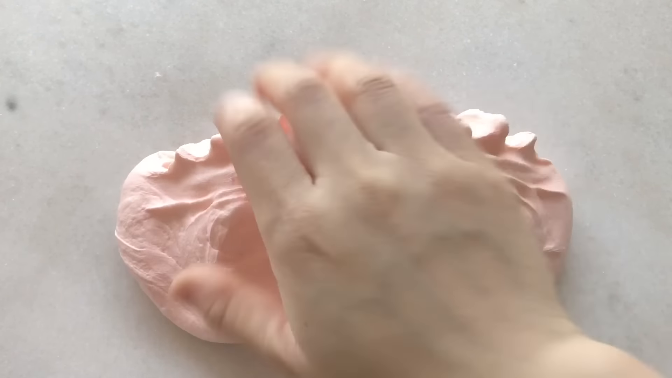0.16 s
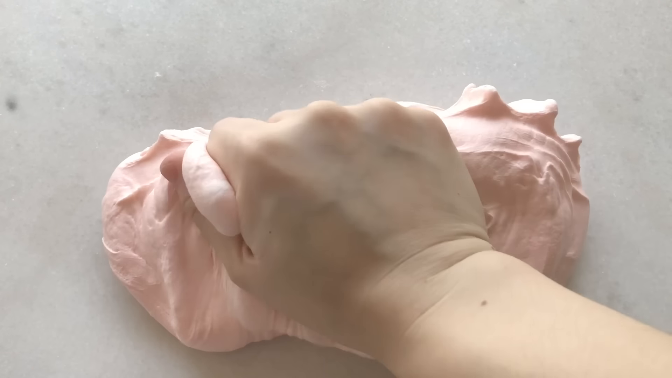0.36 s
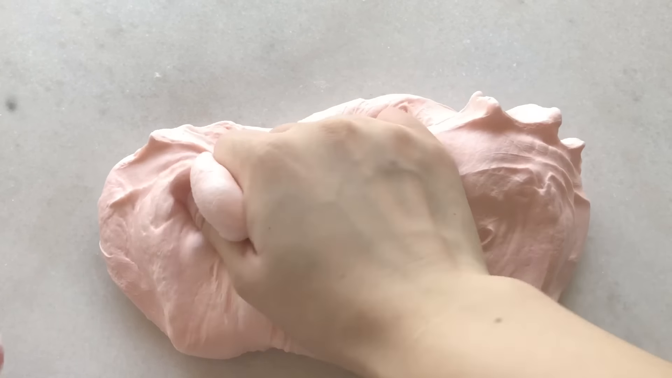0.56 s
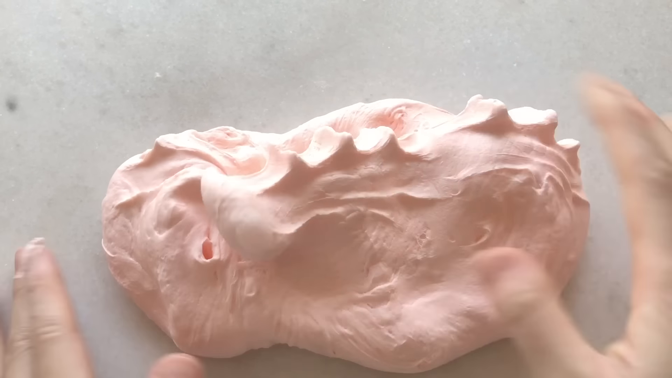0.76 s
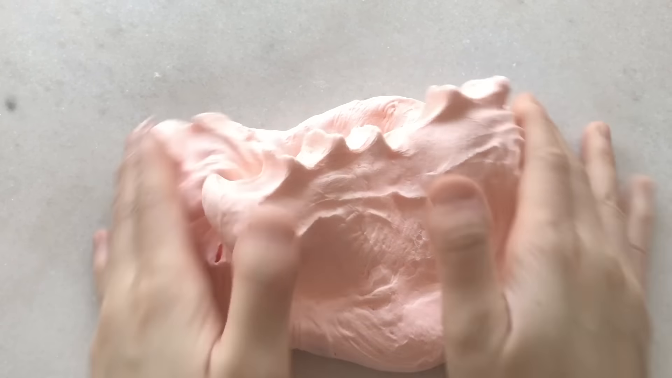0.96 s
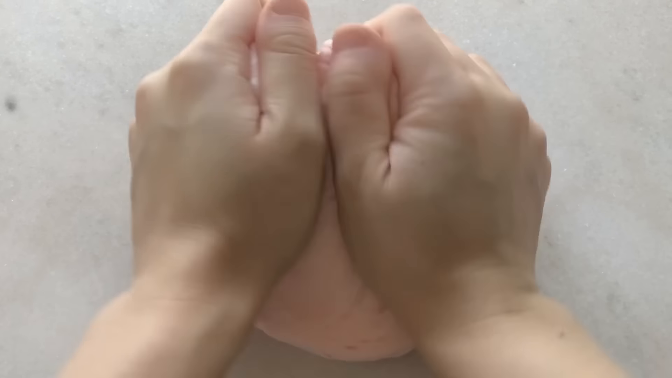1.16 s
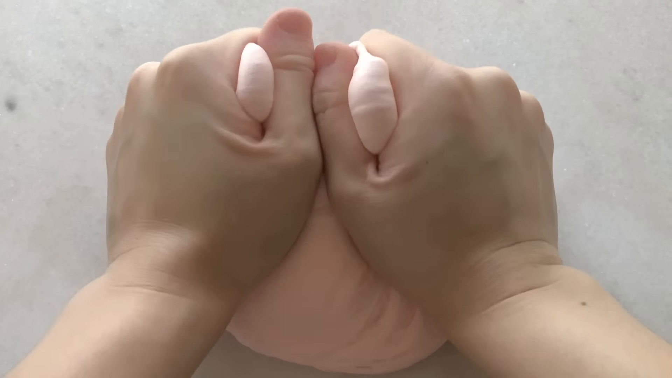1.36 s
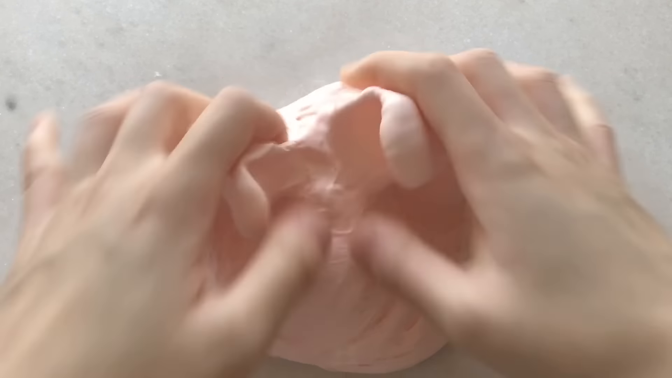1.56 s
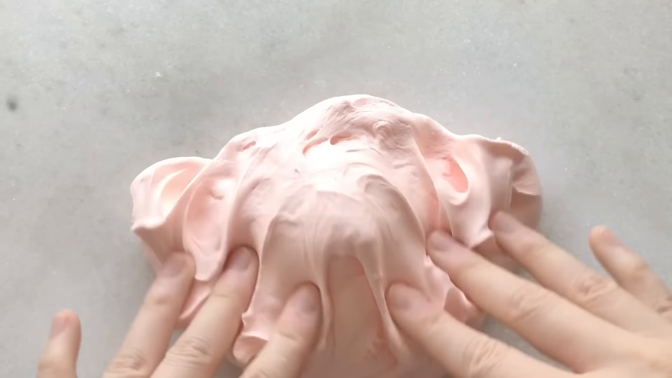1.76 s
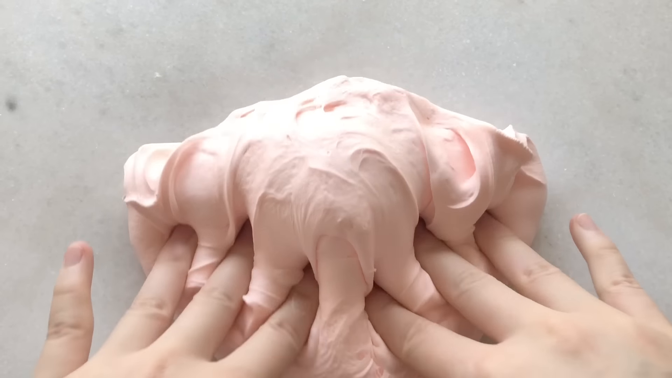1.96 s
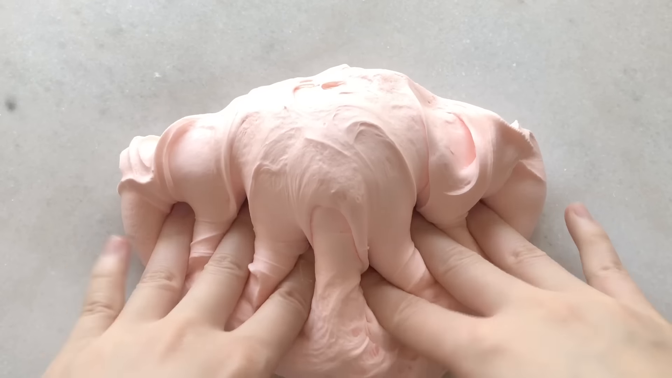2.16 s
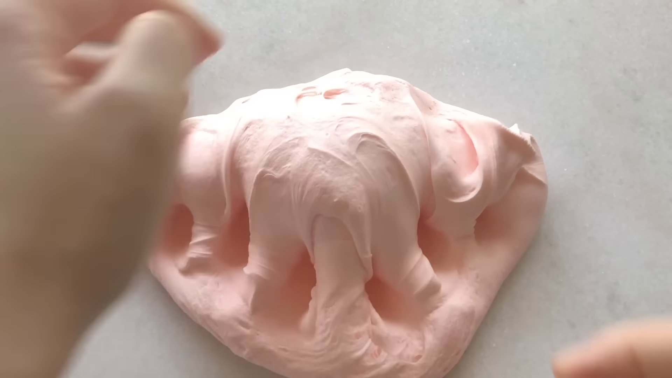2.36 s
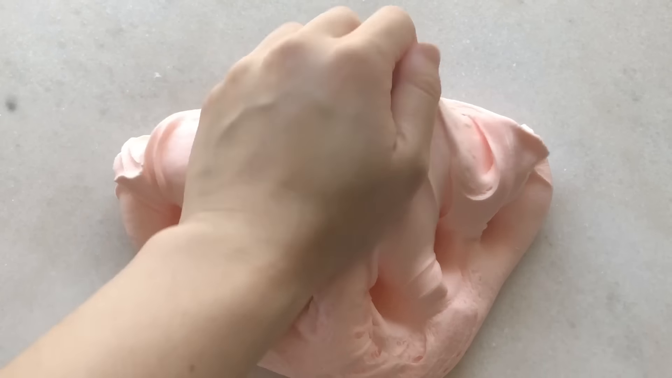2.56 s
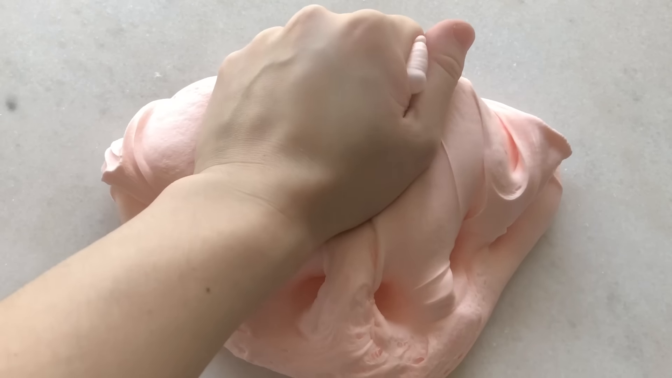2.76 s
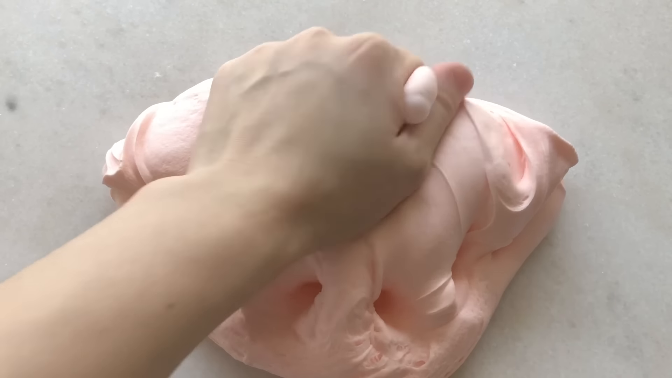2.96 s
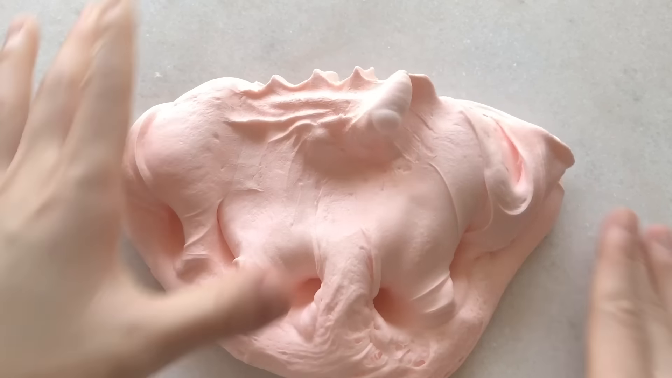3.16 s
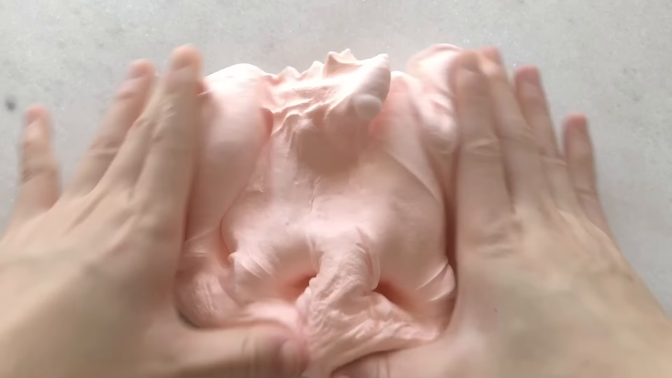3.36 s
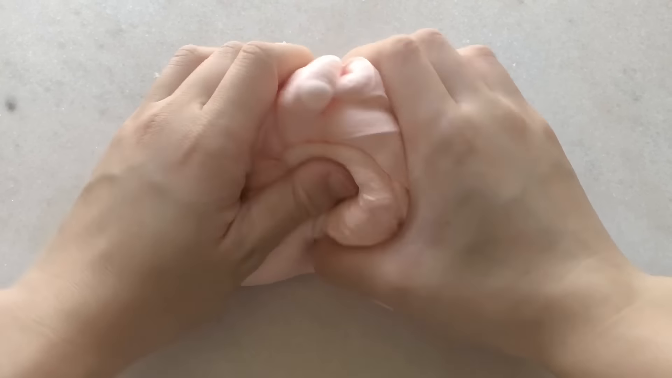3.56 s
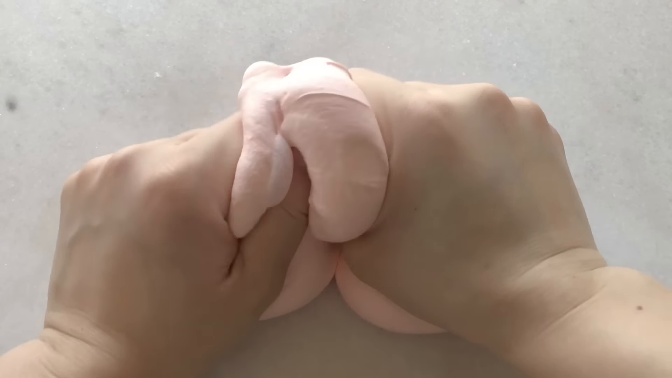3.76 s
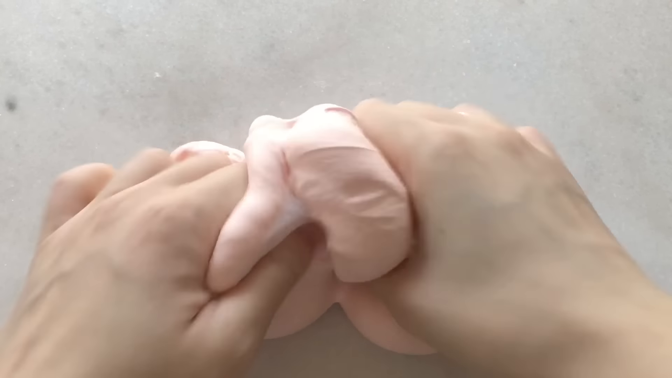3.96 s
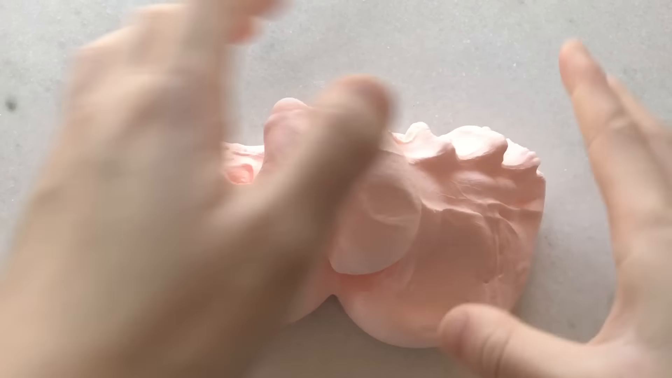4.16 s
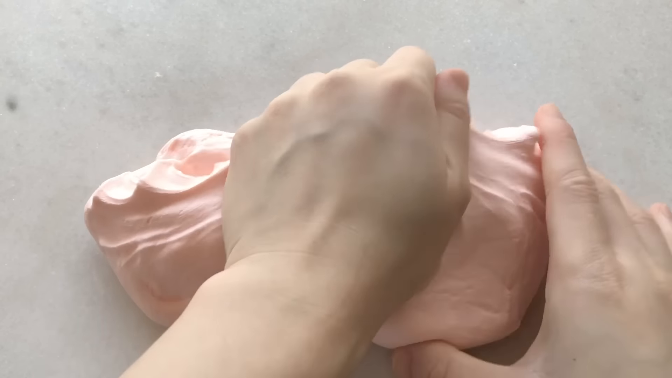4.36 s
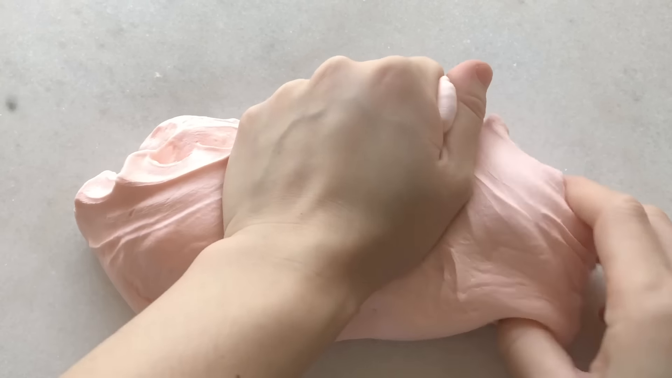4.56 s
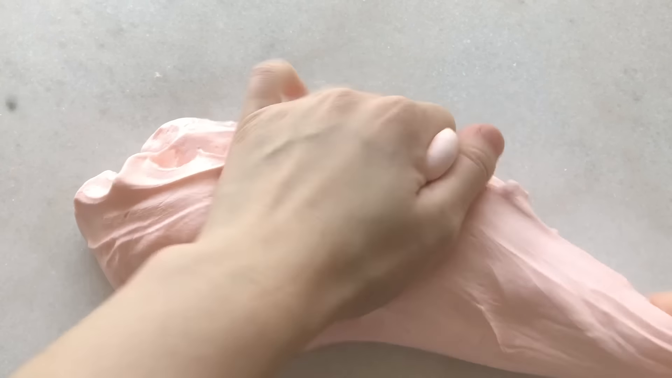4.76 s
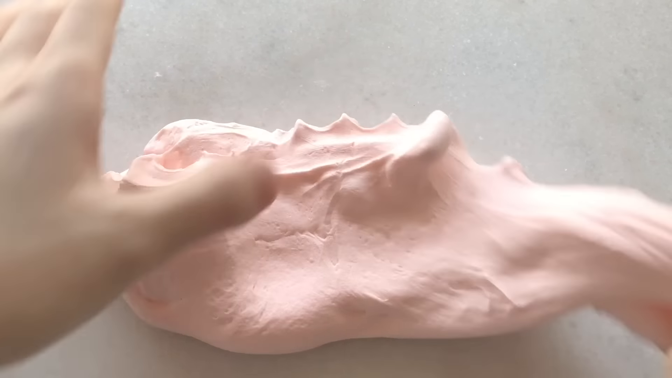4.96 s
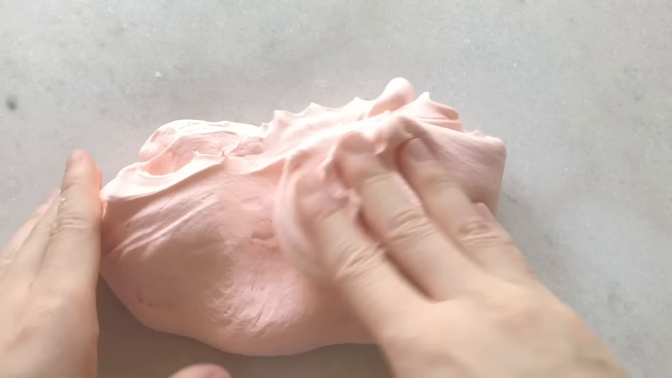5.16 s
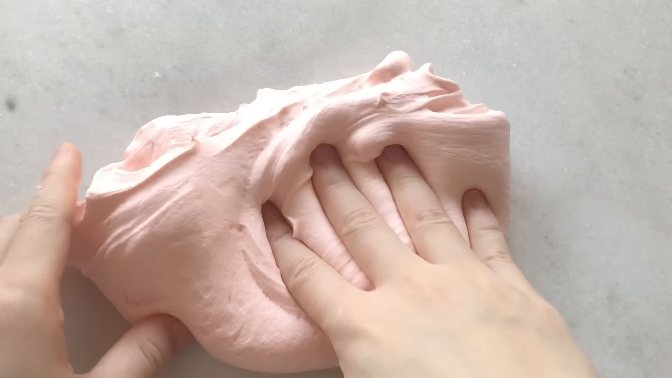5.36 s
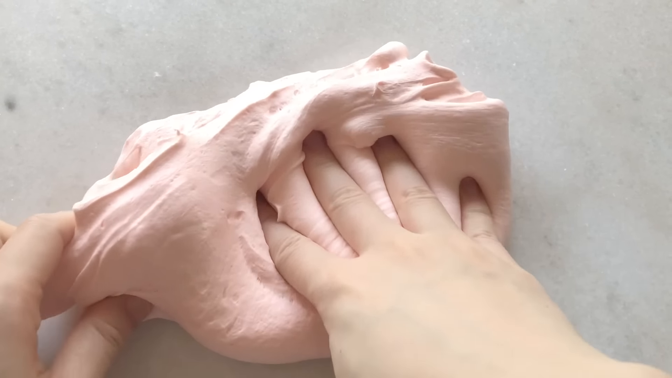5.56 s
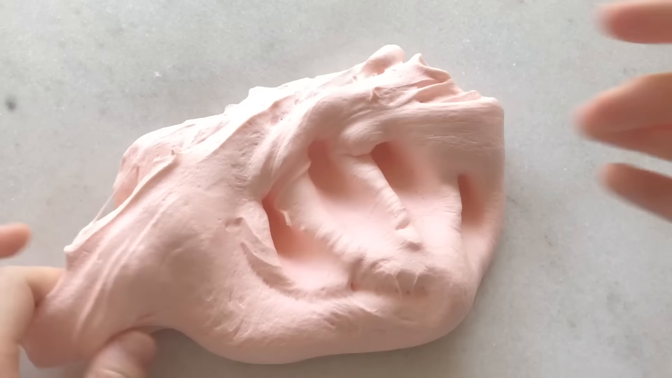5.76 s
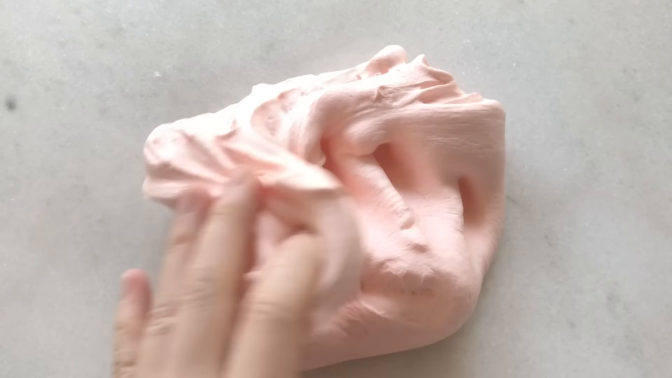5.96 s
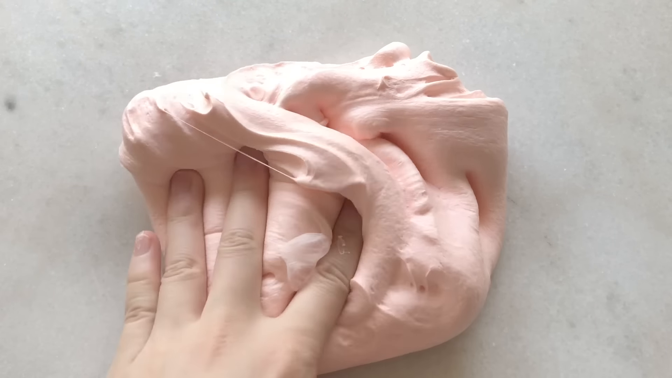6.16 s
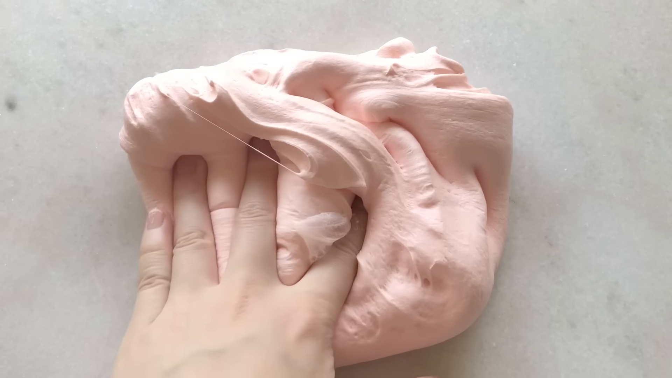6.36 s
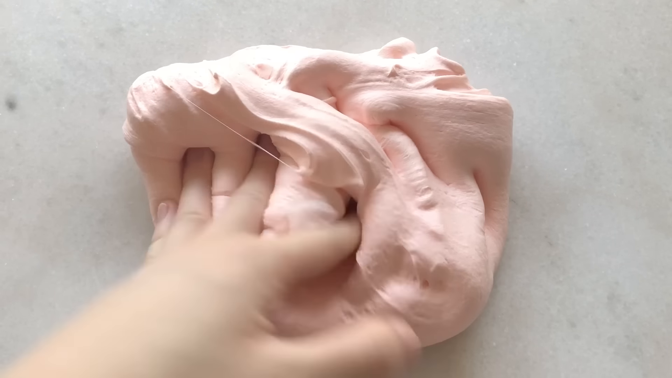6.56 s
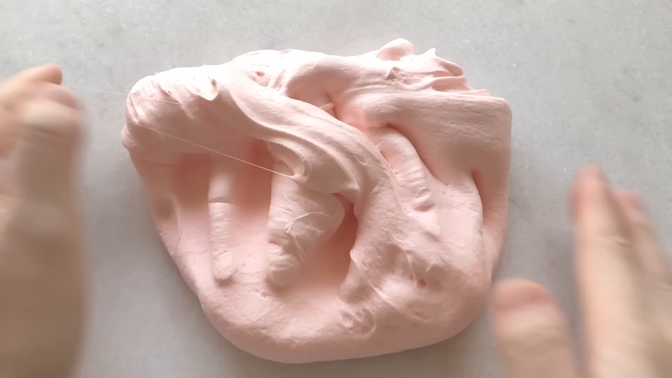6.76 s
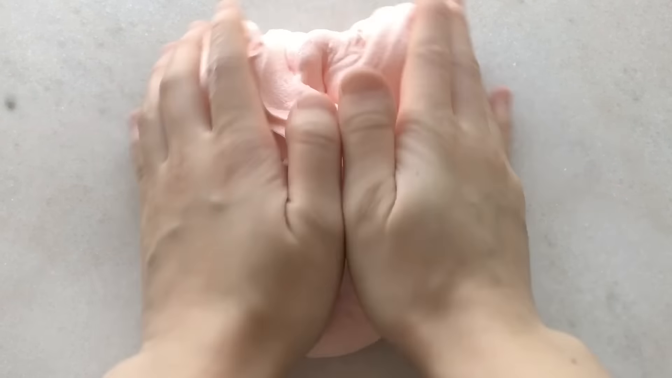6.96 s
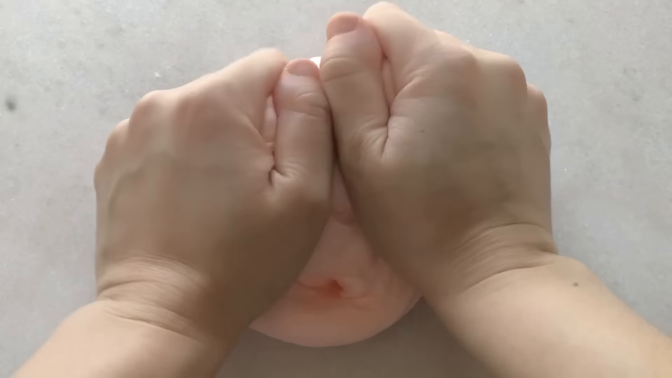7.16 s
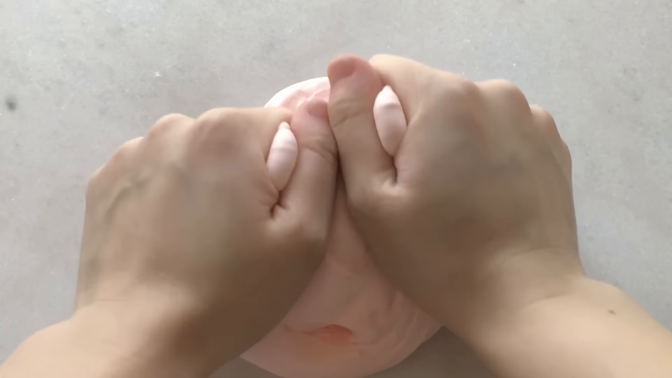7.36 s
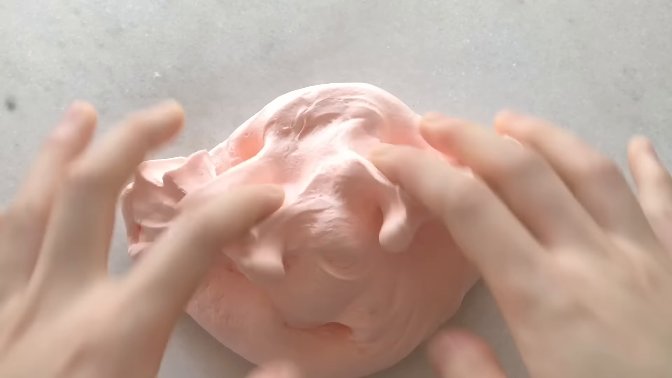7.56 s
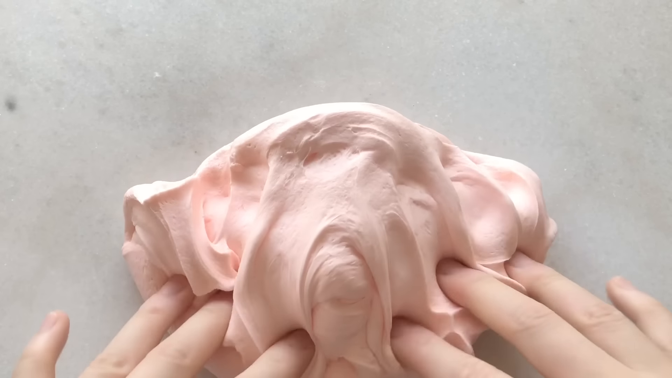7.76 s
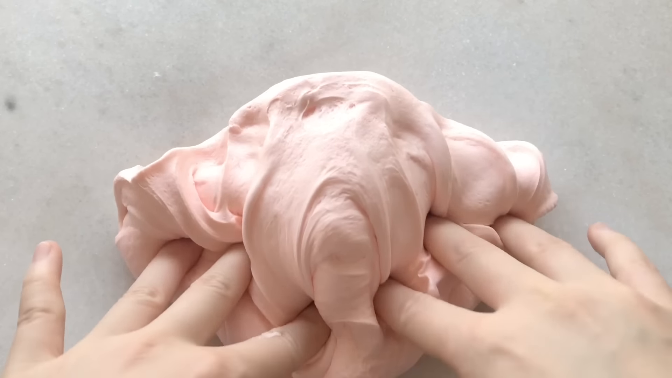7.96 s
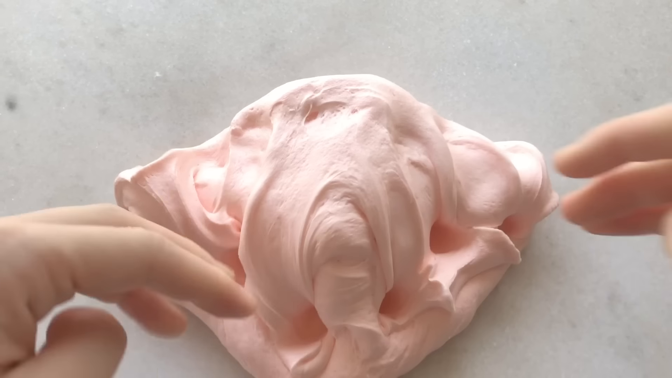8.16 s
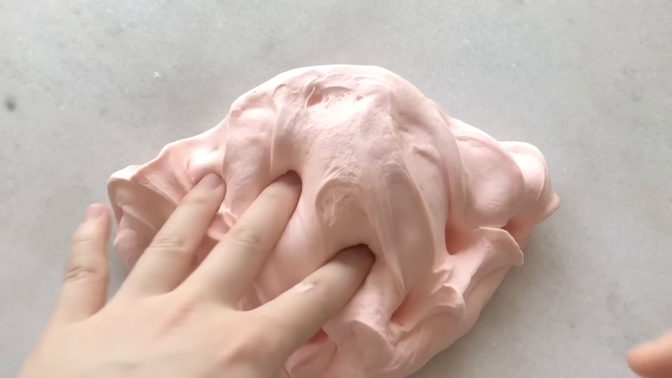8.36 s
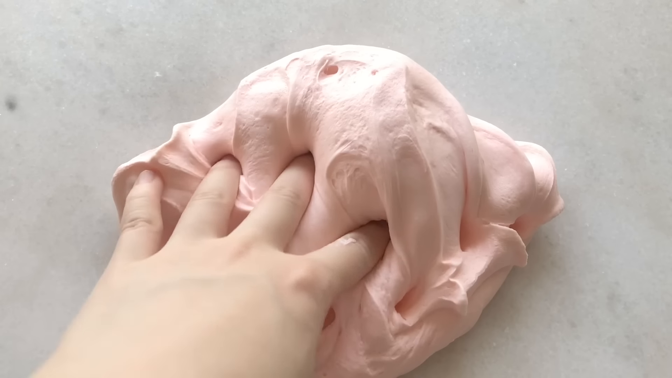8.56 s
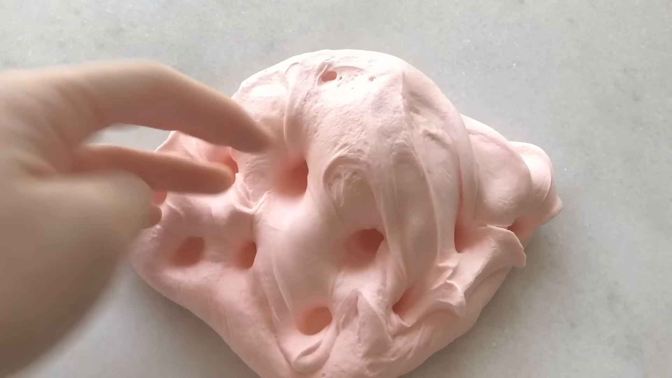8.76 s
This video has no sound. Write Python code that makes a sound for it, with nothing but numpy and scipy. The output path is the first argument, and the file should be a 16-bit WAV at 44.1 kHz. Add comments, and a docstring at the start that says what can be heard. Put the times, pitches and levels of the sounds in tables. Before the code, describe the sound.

A thick foamy slime is squeezed and poked by hand on a hard table, very close, in a small quiet room with faint hiss and a soft low hum. From 0.25 to 0.5 s bright crackles burst in a tight run, then a sticky squelch at 0.65. The strongest early pops, sharp with hollow plops, come at 1.25 to 1.4, with a wet squish near 1.6. Quiet follows until a squelchy plop at 2.3, then snaps around 2.8 and 3.05. From 3.4 to 4.1 softer tacky crackling continues; isolated pops land at 4.55 and 4.85. Faint ticks lead to a burst at 5.7, near silence from 6, and a sticky plopping cluster at 6.65. Loud snaps return at 7.2 to 7.35, a squish at 7.5, a dense popping burst at 8.15, and final sharp cracks at 8.7, then it settles.

```python
"""Thick foamy slime squeezed, folded and poked by hands on a hard table in a small quiet room.
Trapped air pockets burst: the film cracks as a short damped ring with a spray of noise, and a plop of
falling pitch follows the larger ones. The sticky mass tears off skin and table in dense ringing grains.
A near surface returns cracks and tearing 2.6 ms later; table top and room ring on.
Below lie steady coloured noise with a low hum, and a few brief rough tones."""
import sys
import numpy as np
from scipy import signal
from scipy.fft import rfft, irfft
from scipy.io import wavfile

SR = 44100
rng = np.random.default_rng(int(sys.argv[2]) if len(sys.argv) > 2 else 0)


def waveform_to_disk(signal):
    """Save audio, clipped to [-1, 1], as 16-bit WAV at the path in sys.argv[1]."""
    frames = np.transpose(np.atleast_2d(signal))
    scaled = np.clip(frames, -1, 1) * 32767
    samples = np.round(scaled).astype(np.int16)
    wavfile.write(sys.argv[1], SR, samples)


def to_linear_factor(level_db):
    """Convert decibel levels (scalar or array-like) to linear amplitude factors."""
    exponent = np.asarray(level_db, float) / 20
    return 10 ** exponent


N = 388080
NEAR_S = 0.0026  # delay of the near surface


def rms_one(x):
    """Scale to rms 1."""
    return x / np.sqrt(np.mean(x ** 2) + 1e-20)


def band(x, low_hz, high_hz, order=2):
    """Butterworth band-pass."""
    edges_hz = [low_hz, min(high_hz, 0.45 * SR)]
    return signal.sosfilt(signal.butter(order, edges_hz, "band", fs=SR, output="sos"), x)


def ring(clicks, hz, t60_s):
    """Two-pole resonator: a unit click starts a decaying sine of height 1."""
    r = to_linear_factor(-60 / (t60_s * SR))
    w = 2 * np.pi * hz / SR
    return signal.lfilter([0, np.sin(w)], [1, -2 * r * np.cos(w), r * r], clicks + 1e-18)


def drift(knots_per_s):
    """Slow random wander: normal knots joined by straight lines, at most 40 knots per s."""
    knots = rng.standard_normal(int(N / SR * 40) + 3)
    return np.interp(np.arange(N) / SR * knots_per_s, np.arange(len(knots)), knots)


def place(times_s, shapes):
    """Add one short sound per row at its time."""
    out = np.zeros(N + SR)
    at = np.round(times_s * SR).astype(int)[:, None] + np.arange(shapes.shape[1])
    np.add.at(out, at, shapes)
    return out[:N]


# spectrum of the room tone, relative: pitch_hz, density_db (per Hz)
ROOM_SPECTRUM = [(15, -44), (25, 4), (53, 8.5), (76, 12), (212, 6.5), (575, -11), (1040, -13),
                 (2550, -22.5), (4610, -28), (5570, -25), (7710, -30.5), (14800, -29), (16000, -13.5)]


def room_tone(noise_db=-51, waver_db=1.5, waver_per_s=4, hum_hz=80, hum_db=-59, hum_half_width_hz=8):
    """Coloured noise, slightly wavering, plus a narrow noise band as a soft low hum."""
    hz = np.fft.rfftfreq(N, 1 / SR) + 1
    points = np.array(ROOM_SPECTRUM)
    colour = to_linear_factor(np.interp(np.log(hz), np.log(points[:, 0]), points[:, 1]))
    noise = rms_one(irfft(rfft(rng.standard_normal(N)) * colour, N))
    hum = rms_one(band(rng.standard_normal(N), hum_hz - hum_half_width_hz, hum_hz + hum_half_width_hz))
    return to_linear_factor(noise_db + waver_db * drift(waver_per_s)) * noise + to_linear_factor(hum_db) * hum


# brief rough tones: start_s, length_s, pitch_hz, level_db (rms at the top of the swell)
ROUGH_TONES = [(2.455, .07, 284, -49), (2.5, .06, 1000, -64), (2.44, .11, 1370, -58),
               (2.46, .08, 1920, -60), (2.46, .09, 2850, -62), (1.72, .22, 197, -51), (8.33, .2, 1570, -69),
               (4.88, .045, 1000, -39), (7.615, .018, 900, -42), (3.835, .03, 2050, -41),
               (5.92, .025, 900, -56)]


def rough_tones():
    """Narrow noise bands that swell and fade as half a sine; shorter ones are wider."""
    out = np.zeros(N)
    for start_s, length_s, hz, level_db in ROUGH_TONES:
        swell = np.sin(np.pi * np.clip((np.arange(N) / SR - start_s) / length_s, 0, 1))
        widen_hz = 0.5 / length_s
        tone = band(rng.standard_normal(N), hz * 0.95 - widen_hz, hz * 1.05 + widen_hz)
        out += to_linear_factor(level_db) * swell * rms_one(tone)
    return out


def close_microphone(x, bass_cut_hz=218, presence_hz=6500, width_hz=2300, presence_db=2.1):
    """Bass cut, then a presence peak."""
    x = signal.sosfilt(signal.butter(4, bass_cut_hz, "high", fs=SR, output="sos"), x)
    presence = band(x, presence_hz - width_hz / 2, presence_hz + width_hz / 2, order=1)
    return x + (to_linear_factor(presence_db) - 1) * presence


# farther echoes: delay_s, level_db (re direct)
FARTHER_ECHOES = [(.0073, -19), (.0102, -19)]
# room tail by band: pitch_hz, t60_s, level_db (relative energy)
TAIL_BANDS = [(300, 0.3, -23), (900, 0.078, -25), (2700, 0.23, -14.5), (5840, 0.12, -14.5),
              (11000, 0.073, -8)]


def room(x):
    """Discrete echoes, then a tail of noise dying band by band."""
    t = np.arange(SR // 2) / SR
    response = np.zeros(len(t))
    for delay_s, level_db in FARTHER_ECHOES:
        response[round(delay_s * SR)] += to_linear_factor(level_db)
    for hz, t60_s, level_db in TAIL_BANDS:
        onset = 1 - np.exp(-t / 0.001)
        dying = band(rng.standard_normal(len(t)), hz / 1.4, hz * 2.2) * to_linear_factor(-60 * t / t60_s) * onset
        energy = np.sum(dying ** 2) / min(hz * 2 / SR, 1)  # wider bands keep more
        response += to_linear_factor(level_db) * dying / np.sqrt(energy)
    return x + signal.fftconvolve(x, response)[:N]


# low modes of the table top: pitch_hz, level_db (gain into the mode), t60_s
TABLE_MODES = [(183, -29, 0.023), (285, -46, 0.016)]


def table(x):
    """The slime shakes the table top, whose low modes ring on."""
    return x + sum(to_linear_factor(level_db) * ring(x, hz, t60_s) for hz, level_db, t60_s in TABLE_MODES)


# hand strokes tearing the mass: start_s, length_s, level_db (base), wetness_db, hollow_hz
HAND_STROKES = [(0.0, 0.0079, -36.5, -2.5, 390), (0.265, 0.049, -39.5, 3.5, 407),
                (0.366, 0.096, -44.5, -5, 400), (0.494, 0.042, -58, -1.5, 250),
                (0.586, 0.042, -66, -7.5, 210), (0.643, 0.062, -33.5, 5, 250), (0.694, 0.059, -37, 2, 290),
                (0.897, .08, -69, 0.5, 239), (1.028, 0.48, -48, 1.5, 320), (1.273, 0.0052, -27, 5, 355),
                (1.309, 0.021, -41, -11.5, 330), (1.368, 0.047, -41, -5.5, 590),
                (1.45, 0.068, -69, -9, 300), (1.56, 0.086, -31, 4, 315), (1.694, 0.42, -62, -1, 210),
                (2.293, 0.041, -30.5, 6.5, 414), (2.48, 0.14, -55.5, 6.5, 240),
                (2.653, 0.29, -57.5, -3.5, 230), (2.758, 0.08, -49, -4.5, 510),
                (2.878, 0.044, -62, -3, 230), (2.991, 0.011, -51, -1, 240), (3.051, 0.053, -33.5, 5.5, 261),
                (3.089, 0.057, -39, 1, 280), (3.329, 0.071, -52, 1.5, 228), (3.41, .16, -47, 0, 324),
                (3.617, 0.19, -50.5, 1, 300), (3.711, 0.0078, -41.5, 6.5, 490), (3.766, 0.15, -53, 3, 260),
                (3.853, 0.013, -43, 1.5, 400), (3.93, 0.13, -50, 2.5, 350), (3.994, 0.079, -41.5, 0.5, 350),
                (4.038, 0.071, -32, 3, 380), (4.364, 0.044, -54, 12, 300), (4.416, 0.2, -55.5, 2.5, 260),
                (4.553, 0.04, -47, -2, 674), (4.645, 0.011, -51.5, -22.5, 240),
                (4.707, 0.21, -57.5, 1.5, 230), (4.788, 0.0039, -39, 7, 294), (4.835, 0.055, -32, 3, 486),
                (5.007, 0.051, -48, -0.5, 280), (5.09, 0.74, -61, 1.5, 220),
                (5.707, 0.053, -34.5, 1.5, 340), (5.754, 0.022, -39, 15.5, 394),
                (5.84, 0.3, -57.5, -1, 260), (5.939, .09, -54, 6, 282), (6.102, 0.13, -63.5, 1.5, 218),
                (6.234, 0.065, -68.5, -14, 220), (6.301, 0.18, -72, 0.5, 220),
                (6.623, 0.045, -39.5, 0, 300), (6.665, 0.046, -35, 7.5, 370),
                (6.973, 0.082, -44.5, 1.5, 400), (7.052, 0.097, -54.5, 0, 285), (7.139, 0.082, -43, 2, 310),
                (7.21, 0.045, -66, -5, 450), (7.283, 0.032, -31, 2.5, 424), (7.35, 0.069, -51, 0, 400),
                (7.477, 0.11, -36, 1, 275), (7.598, 0.093, -49, 4.5, 255), (7.72, 0.33, -62, 0, 210),
                (8.14, 0.073, -37.5, 9, 450), (8.27, 0.26, -63.5, 2.5, 226), (8.717, 0.11, -41, 1, 277)]
# film crackle, suction, squelch: offset_db (re base), wetness_share (dB per dB),
# sag_db (over a stroke), rest_db (slime at rest)
PART_RULES = [(-0.5, -1.055, 5.5, -81), (-1.43, -0.28, 5.5, -84.5), (-2.5, 1.07, 4, -71)]


def strokes(rise_s=0.025, rise_share=0.3, fall_s=0.035, fall_share=0.15, rest_hollow_hz=210):
    """Levels in dB of the three tearing parts; hollow pitch is the squelch-power-weighted mean of strokes."""
    start_s, length_s, level_db, wet_db, hollow_hz = np.transpose(HAND_STROKES)[:, :, None]
    s = np.arange(0, N + 64, 64) / SR
    now_s = np.arange(N) / SR
    before_s = np.maximum(start_s - s, 0)
    after_s = np.maximum(s - start_s - length_s, 0)
    # 30 dB per rise or fall time: a fixed time plus a share of the length
    rise = before_s / (rise_s + rise_share * length_s)
    fall = after_s / (fall_s + fall_share * length_s)
    edges_db = -30 * (rise + fall)
    done = np.clip((s - start_s) / length_s, 0, 1)
    levels_db = []
    for offset_db, share, sag_db, rest_db in PART_RULES:
        power = to_linear_factor(level_db + offset_db + share * wet_db - sag_db * done + edges_db) ** 2
        rest = to_linear_factor(rest_db) ** 2
        total = power.sum(0) + rest
        levels_db.append(np.interp(now_s, s, 10 * np.log10(total)))
    # the loop leaves the squelch in power, rest and total
    hollow = ((power * hollow_hz).sum(0) + rest * rest_hollow_hz) / total
    return levels_db, np.interp(now_s, s, hollow)


# grains of film crackle, suction, squelch: low_hz, high_hz, rate_per_s, size_spread_db,
# decay_cycles (to 1/e)
GRAIN_PARTS = [(4100, 19600, 13000, 3.5, 1.0), (806, 4110, 3000, 3.5, 1.7), (157.3, 1000, 700, 3.5, 1.8)]


def tack(levels_db, hollow_hz, pitches=10, tilt_db_per_octave=-0.3, hollow_octaves=0.48, hollow_db=9,
         clump_db=2.3, clumps_per_s=38.0, near_db=-16.5):
    """Threads of slime snap at random, in clumps, each ringing at one of ten pitches; the hollow favours its own."""
    out = np.zeros(N)
    clumps_db = clump_db * drift(clumps_per_s)
    for level_db, (low_hz, high_hz, per_s, spread_db, cycles) in zip(levels_db, GRAIN_PARTS):
        born = rng.random(N) < per_s / SR
        size_db = spread_db * np.minimum(rng.exponential(1, N), 5)
        snaps = born * to_linear_factor(size_db) * rng.choice([-1, 1], N)
        dealt = rng.integers(0, pitches, N)
        grains, power = 0, 0
        for k, hz in enumerate(np.geomspace(low_hz * 1.1, high_hz, pitches)):
            favour = np.exp(-0.5 * (np.log2(hz / hollow_hz) / hollow_octaves) ** 2)
            gain = to_linear_factor(hollow_db * favour + tilt_db_per_octave * np.log2(hz / low_hz))
            t60_s = np.log(1000) * cycles / hz
            grains = grains + gain * rms_one(ring(snaps * (dealt == k), hz, t60_s))
            power = power + gain ** 2
        grains = band(grains / np.sqrt(power), low_hz / 1.026, high_hz * 1.2)
        out += grains * to_linear_factor(level_db + clumps_db)
    lag = round(NEAR_S * SR)
    out[lag:] += to_linear_factor(near_db) * out[:-lag]
    return out


# large pockets emptying: start_s, level_db (envelope peak at source), pitch_hz (settled)
POCKET_PLOPS = [(0.249, -27.5, 332), (0.259, -26.5, 650), (0.287, -39, 315), (0.413, -30.5, 290),
                (0.462, -37.5, 272), (0.632, -34, 250), (0.653, -26, 265), (0.688, -27, 894),
                (0.722, -32.5, 283), (0.887, -33.5, 280), (1.107, -36.5, 310), (1.176, -50, 221),
                (1.184, -32.5, 348), (1.204, -48, 232), (1.262, -15, 540), (1.267, -15, 345),
                (1.302, -40, 363), (1.362, -47, 840), (1.56, -21.5, 412), (1.566, -22.5, 402),
                (1.604, -26.5, 225), (2.28, -18.5, 330), (2.294, -26, 355), (2.302, -27, 496),
                (2.314, -17.5, 467), (2.348, -25.5, 613), (2.375, -38, 269), (2.775, -24, 425),
                (3.051, -17, 246), (3.082, -24, 288), (3.095, -28.5, 910), (3.105, -37, 299),
                (3.685, -23, 325), (3.993, -39, 221), (4.046, -20, 400), (4.09, -43, 304),
                (4.102, -42, 872), (4.332, -30, 514), (4.364, -26.5, 292), (4.785, -33, 286),
                (4.834, -20.5, 260), (4.852, -25, 285), (4.856, -16, 730), (5.195, -39.5, 252),
                (5.699, -20, 274), (5.718, -33, 226), (5.751, -34, 465), (5.782, -22, 321),
                (6.625, -23, 260), (6.67, -29, 300), (6.686, -22, 362), (6.699, -24.5, 426),
                (6.71, -20.5, 375), (6.928, -39.5, 257), (7.137, -36, 250), (7.151, -33.5, 272),
                (7.176, -24.5, 364), (7.202, -32, 354), (7.265, -7, 369), (7.293, -44, 463),
                (7.506, -30, 410), (7.529, -30.5, 213), (7.673, -45, 255), (8.128, -10, 445),
                (8.152, -7, 970), (8.154, -21.5, 244), (8.169, -23, 1000), (8.177, -20, 610),
                (8.182, -16, 385), (8.708, -21, 269), (8.733, -21.5, 282), (8.749, -24, 280)]


def plops(peak_cycles=1.25, fall=2.6, fall_cycles=0.38, rough=0.55):
    """An emptied pocket plops: pitch falls from (1 + fall) times to its settled value, phase wobbling."""
    start_s, level_db, hz = np.transpose(POCKET_PLOPS)[:, :, None]
    t = np.arange(1300) / SR
    turns = hz * t + fall * fall_cycles * (1 - np.exp(-hz * t / fall_cycles))
    wobble = np.cumsum(rng.standard_normal((len(POCKET_PLOPS), len(t))), axis=1)  # wet walls
    turns = turns + rough * wobble * np.sqrt(hz / SR) / 10
    age = t * hz / peak_cycles
    envelope = np.e * age * np.exp(-age)
    return place(start_s[:, 0], to_linear_factor(level_db) * envelope * np.sin(2 * np.pi * turns))


def small_cracks(film_db, count=700, per_s=40.0, above_film_db=16, spread_db=5.5, max_db=-22,
                 low_hz=1900, high_hz=9650, echo_db=-11):
    """Crack rows for small pockets at random times, their level following the film crackle."""
    gap, size, pitch = rng.random((count, 3)).T
    start_s = np.cumsum(-np.log(1 - gap)) / per_s
    film_now_db = film_db[np.minimum(start_s * SR, N - 1).astype(int)]
    level_db = film_now_db + above_film_db + spread_db * (2 * size - 1)
    hz = low_hz * (high_hz / low_hz) ** pitch
    return np.c_[np.minimum(start_s, N / SR), np.minimum(level_db, max_db), hz, 0 * start_s + echo_db]


# films of air pockets rupturing: start_s, level_db (at source), pitch_hz,
# echo_db (near echo re crack, capped in cracks)
POCKET_CRACKS = [(0.2424, -23, 3740, -3.5), (0.2653, -30, 6730, -6), (0.2784, -35, 3470, 2),
                 (0.2878, -15.5, 2940, -10), (0.3064, -29, 7700, 12), (0.3166, -21, 8060, -6),
                 (0.3247, -26, 2920, -2), (0.3469, -8, 7330, -3), (0.3536, -15.5, 7240, -3),
                 (0.3664, -6, 7100, -10.5), (0.3698, 0.5, 8730, -4), (0.4063, -23, 2990, 0),
                 (0.413, -8.5, 14000, -5), (0.42, -5.5, 12700, -5), (0.461, -32, 2380, -8),
                 (0.4683, -16.5, 10100, -6), (0.632, -26, 5480, 4), (0.6506, -19, 4150, -3),
                 (0.6876, -24, 3540, 3), (0.7224, -26, 3140, 0), (0.767, -31, 3510, -8),
                 (0.8842, -44, 3690, -21), (0.9254, -37, 2380, -10), (0.9961, -33, 4420, -3),
                 (1.104, -27, 3070, -9), (1.134, -32, 3590, -4), (1.175, -25.5, 2410, -10),
                 (1.1847, -26, 6590, -6), (1.216, -28, 6690, -6), (1.253, -27, 11500, -4),
                 (1.264, -5.5, 3400, -12), (1.269, -2, 3160, -10), (1.294, -12, 9490, -3),
                 (1.3042, 5, 6800, -7), (1.3314, -14, 12400, -2), (1.364, 3, 5770, -1),
                 (1.379, -11, 6120, -6), (1.4356, -25, 3420, -9), (1.5517, -24, 3220, -3),
                 (1.5571, -14, 4440, 1), (1.5646, -12, 4070, -6), (1.574, -22, 3530, -2),
                 (1.6044, -23, 2840, 0), (1.6558, -24, 5520, -2), (1.6821, -31.5, 2440, 0),
                 (1.777, -35, 2830, -3), (1.7993, -35, 11100, -6), (1.8724, -24, 4910, -14),
                 (1.8886, -31, 4930, -14), (1.894, -30.5, 4110, -7), (1.9428, -34.5, 3710, -10),
                 (2.1027, -47.5, 2470, -10), (2.2785, -15.5, 5580, -4), (2.2944, -24, 5180, -3),
                 (2.3018, -16, 7750, -3), (2.3129, -12, 6890, 9), (2.3475, -15, 4700, -15.5),
                 (2.575, -42, 3050, -5.5), (2.615, -22, 9000, -0.5), (2.655, -29.5, 3990, -3),
                 (2.7024, -29, 13100, -8), (2.7116, -22.5, 7100, 2), (2.7326, -24, 13400, -8),
                 (2.7578, -23, 7500, 3), (2.7738, -4, 4970, 12), (2.8314, -40, 14300, -8),
                 (2.8565, -22.5, 8550, -4), (2.8737, -13, 14100, -15), (2.9095, -18, 4100, -5),
                 (2.9832, -25, 13300, 2), (3.0518, -13.5, 3450, -4), (3.0834, -29, 3560, -5.5),
                 (3.096, -28, 2970, -6), (3.1164, -20, 4870, -7), (3.3144, -43, 3050, -8),
                 (3.3323, -45, 3100, -5.5), (3.3906, -35, 3630, -11), (3.4626, -39, 3060, -6),
                 (3.5349, -25.5, 3830, 5), (3.574, -27, 4990, -14), (3.5865, -20.5, 2920, -5),
                 (3.6003, -26, 5360, -17), (3.63, -39, 2860, -6), (3.6735, -20.5, 5710, -10),
                 (3.686, -8.5, 2870, -4.5), (3.706, -17, 7310, -4), (3.7236, -20, 5570, -13),
                 (3.7417, -26, 5100, -14), (3.765, -16, 3540, -5), (3.7834, -25, 7260, -19.5),
                 (3.7903, -17, 6750, -9), (3.7985, -19, 6300, -18), (3.8411, -15.5, 8300, 10),
                 (3.925, -11.5, 3720, -3.5), (3.9304, -26, 3820, -2), (3.9903, -31, 7030, -6),
                 (4.001, -28, 7060, -9), (4.0253, -32, 3580, -1), (4.0461, -17, 2450, -8),
                 (4.0914, -28.5, 5320, 1.5), (4.3092, -37, 2520, -7.5), (4.3311, -30, 2650, -1),
                 (4.362, -32.5, 2460, -4), (4.4026, -28, 3420, -10), (4.4209, -39, 3000, -6),
                 (4.4935, -22, 10300, 2.5), (4.5501, -7.5, 3900, 3), (4.566, -32, 3630, -6),
                 (4.616, -28, 2620, -4), (4.6239, -21, 13500, -6), (4.6334, -21, 3660, 4),
                 (4.6409, -26, 6520, -9), (4.7855, -26, 4060, -6), (4.825, -24, 4550, -12),
                 (4.8542, -21, 4730, 6), (4.8564, -18.5, 2930, -6), (5.004, -31, 2730, 2),
                 (5.1952, -34, 7240, -19), (5.2044, -31, 3540, 0), (5.2264, -24, 6200, -10),
                 (5.245, -30, 6890, 2), (5.2666, -28, 6160, -18), (5.2757, -27, 2400, 4),
                 (5.2937, -17.5, 9100, -9), (5.6214, -37, 5900, -10), (5.6985, -12.5, 5500, 7),
                 (5.716, -21, 8100, -4), (5.7501, -12.5, 2450, -10), (5.7608, -16.5, 2840, -9),
                 (6.1666, -33, 6270, -11.5), (6.195, -37.5, 7600, -5), (6.4662, -43.5, 3110, -7),
                 (6.6254, -13.5, 4520, -1.5), (6.6608, -22, 2690, 3), (6.6709, -19, 3550, -11),
                 (6.6994, -21.5, 2780, -7), (6.7102, -29, 2630, -8), (6.7308, -38, 3540, -11),
                 (6.93, -29, 2790, -8.5), (7.005, -23, 9370, -1.5), (7.0744, -43, 6980, -9),
                 (7.159, -31, 2750, -9), (7.1762, -25, 2780, 2), (7.2002, -7.5, 6340, -8.5),
                 (7.231, -18, 6760, 3), (7.2482, -22, 11800, -13), (7.2654, 4.5, 3270, 5),
                 (7.2822, -16, 6570, -15), (7.3093, -18, 14500, -2), (7.3217, -11, 2440, -17),
                 (7.3336, -2, 10900, -19), (7.399, -30, 11700, -6), (7.4243, -31.5, 2860, -4),
                 (7.466, -32, 2990, -6), (7.5044, -23, 3640, -1), (7.6743, -26.5, 5980, -3),
                 (7.9146, -34, 10900, -9), (7.9242, -28.5, 11100, -8), (7.9574, -42.5, 4320, -5),
                 (8.123, -18.5, 3800, -3), (8.127, -3, 4140, -20), (8.15, -3.5, 6400, -17),
                 (8.156, -8, 5440, -12), (8.1682, -12, 2760, -4), (8.1757, -4.5, 6400, -7),
                 (8.1832, -11.5, 6240, -2), (8.1984, -29, 2760, 1.5), (8.47, -27, 13800, -17.5),
                 (8.4852, -34, 6200, -9), (8.7068, -0.5, 4300, -17), (8.7353, 1, 5540, -21),
                 (8.7478, -12.5, 5300, -10)]


def cracks(rows, spray_db=-4.0, spray_cutoff_hz=12500, spray_s=0.00065, tear=0.51, echo_pitch_ratio=1.7,
           max_echo_db=2, decay_cycles=1.2, rise_s=0.00008):
    """A ruptured film cracks and rings a cycle or two; the near surface sends it back."""
    start_s, level_db, hz, echo_db = np.transpose(rows)[:, :, None]
    t = np.arange(500) / SR
    noise = rng.standard_normal((len(rows), 2, len(t)))
    spray = signal.lfilter(*signal.butter(1, spray_cutoff_hz, fs=SR), noise)
    lasting_s = spray_s * (1 + tear * to_linear_factor(level_db))  # a big pocket tears for longer

    def crack(ring_hz, spray_noise):
        """Damped ring with a spray of noise."""
        ringing = np.sin(2 * np.pi * ring_hz * t) * np.exp(-t * ring_hz / decay_cycles)
        sprayed = to_linear_factor(spray_db) * spray_noise * np.exp(-t / lasting_s)
        return (ringing + sprayed) * (1 - np.exp(-t / rise_s))

    direct = to_linear_factor(level_db) * crack(hz, spray[:, 0])
    # the surface sees the crack from another side: other pitch, other spray
    echo = to_linear_factor(level_db + np.minimum(echo_db, max_echo_db)) * crack(hz * echo_pitch_ratio, spray[:, 1])
    return place(start_s[:, 0], direct) + place(start_s[:, 0] + NEAR_S, echo)


def scene():
    """Slime on the table in the room, over rough tones and room tone."""
    levels_db, hollow_hz = strokes()
    bursts = cracks(POCKET_CRACKS) + plops() + cracks(small_cracks(levels_db[0]))
    slime = bursts + tack(levels_db, hollow_hz)
    heard = close_microphone(room(table(slime)))
    return (heard + rough_tones() + room_tone())[None]


def low_pass(x):
    """Removes everything above the highest recorded frequency."""
    return signal.sosfilt(signal.butter(12, 16430, fs=SR, output="sos"), x)


def record(dry):
    """Peaks beyond full scale clip; the lowest bass and the top are cut."""
    clipped = np.clip(dry, -1, 1)
    cut = signal.sosfilt(signal.cheby2(10, 50, 16300, fs=SR, output="sos"), clipped)
    cut = signal.sosfilt(signal.butter(2, 60, "high", fs=SR, output="sos"), cut)
    return low_pass(np.clip(cut, -1, 1))


dry = scene()
out = record(dry)
waveform_to_disk(out)
```